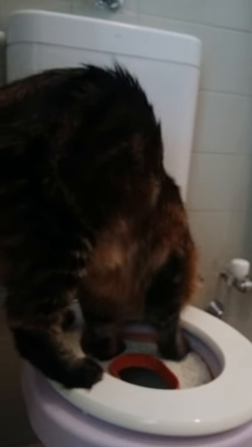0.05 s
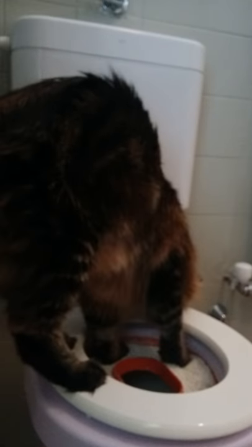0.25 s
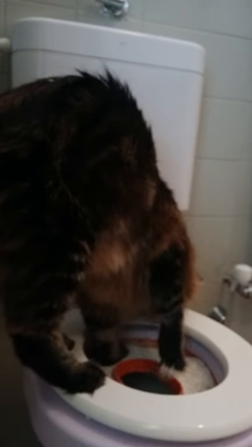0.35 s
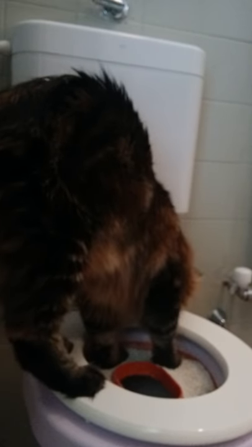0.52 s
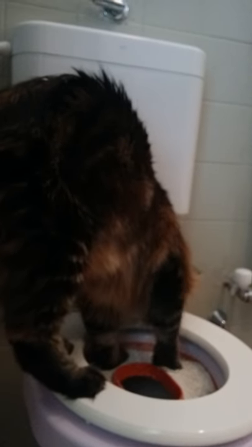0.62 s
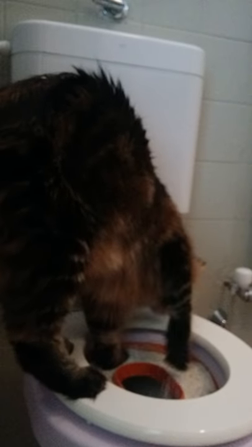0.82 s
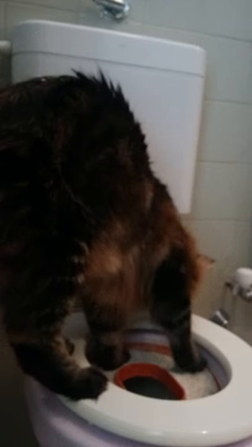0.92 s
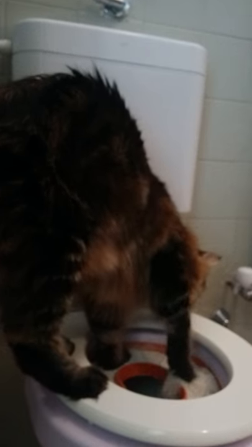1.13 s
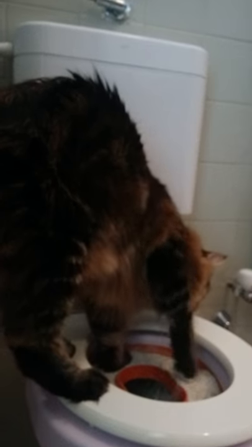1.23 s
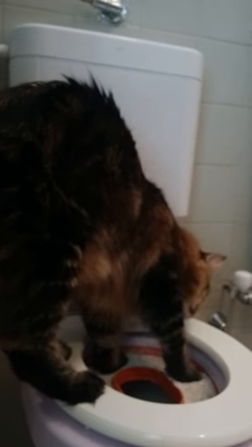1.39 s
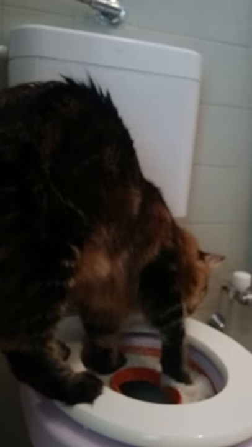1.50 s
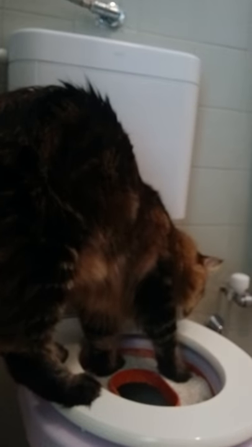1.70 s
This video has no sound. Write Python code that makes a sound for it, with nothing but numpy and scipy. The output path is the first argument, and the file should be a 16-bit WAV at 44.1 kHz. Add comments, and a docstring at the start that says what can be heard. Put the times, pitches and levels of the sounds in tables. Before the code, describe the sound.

A cat digs in grainy litter in a plastic tray. A few grains stir, then at about 0.2 seconds the tray snaps loudly, ringing briefly in a small tiled bathroom, and grains scatter. Three softer scraping strokes follow at about 0.7, 1.1 and 1.5 seconds, with thin claw scratches, skittering grains and soft low bumps from the tray. The gaps between strokes are nearly silent.

```python
"""A cat digs in grainy litter in a plastic training tray set in a toilet, in a small tiled bathroom.
First a few grains stir. At about 0.2 s a claw catches the tray, which snaps back and rings.
From about 0.6 s the paw lands and drags through the litter three times: claws scratch,
loose grains skitter over the plastic, and the tray booms softly under the cat's weight.
In the gaps, and as the last stroke dies away, a phone's noise suppressor turns the sound down."""
import sys
import numpy as np
from scipy import signal
from scipy.fft import rfft, irfft
from scipy.io import wavfile
from scipy.ndimage import uniform_filter1d

SR = 44100
rng = np.random.default_rng(int(sys.argv[2]) if len(sys.argv) > 2 else 0)


def log_audio(samples):
    """Write samples as a 16-bit WAV file to the path given in sys.argv[1]."""
    # one column per channel
    frames = np.atleast_2d(samples).T
    # limit to full scale, then quantise
    limited = np.clip(frames, -1, 1)
    pcm = np.round(limited * 32767).astype(np.int16)
    wavfile.write(sys.argv[1], SR, pcm)


N = 77175

# Each level_db is relative to the other rows of its table.
# Tone colours, or how strong each sound is from low to high: pitch_hz, level_db
ROOM_NOISE_TONE = [(25, -11.5), (45, -10), (65, -0.5), (95, -3), (200, -14.5), (400, -15.5), (700, -9.5),
                   (1400, -11.5), (3000, -18.5), (6000, -14.5), (16000, -18.5)]
CREAK_TONE = [(30, -14.5), (100, -11), (160, -1), (240, -9.5), (320, -8), (410, -16.5), (540, -8),
              (800, -6.5), (1400, -17.5), (4000, -44)]
SKITTER_TONE = [(200, -29), (900, -24.5), (2700, -32.5), (3700, -13.5), (4700, -7), (5400, -1.5), (6200, 2),
                (7300, -4), (10000, -6.5), (13500, -11.5), (16000, -23)]
SCRATCH_TONE = [(200, -36), (1200, -19), (2500, -24.5), (3500, -14), (4500, -11.5), (5100, 1.5), (6100, -1),
                (7200, -8.5), (8500, -18), (16000, -33)]
PAW_TONE = [(30, -36.5), (150, -30.5), (450, -35), (750, -10), (1000, -5.5), (1200, 2.5), (1450, 2),
            (1750, -2), (2150, 0), (2800, -10), (3400, -28.5), (6000, -38), (16000, -54.5)]
DRAG_TONE = [(30, -29.5), (100, -20), (200, -10.5), (380, -16.5), (580, -5.5), (950, -1), (1200, 1),
             (1650, -2), (2100, 4.5), (2800, -3.5), (3700, -1.5), (5200, -7), (6100, -5.5), (8000, -13.5),
             (11000, -22.5), (16000, -33.5)]
SNAP_TONE = [(30, -34), (100, -29), (320, -22), (450, -32), (700, -27), (930, -12.5), (1090, -10.5),
             (1190, 2), (1450, -1), (1750, -3.5), (2200, -6), (2600, -2.5), (3000, -11.5), (3450, -6.5),
             (3900, -12), (4900, -2), (5400, -7), (6000, -0.5), (7000, -8.5), (8300, -1.5), (9700, -6.5),
             (11300, -7.5), (12600, -17), (16000, -21.5)]
# The tray's low booming notes and high ringing notes: pitch_hz, level_db, ring_s (time to fade 60 dB)
TRAY_LOW_NOTES = [(141.7, -5, 0.11), (167.7, -1, 0.18), (314.6, -17, 0.21), (524, -22.5, .3)]
TRAY_HIGH_NOTES = [(1151.8, 2, 0.52), (1271, 1, .4), (1432, -6, 0.45), (1533, -2, .32), (1720, -2.5, .34),
                   (2703, -7.5, 0.15), (4450, -7, .2), (5880, -4, 0.19), (5900, -4, 0.22), (7643, -7, .2),
                   (8334, -7.5, 0.12)]
# The cat's weight pushing on the tray: start_s, level_db, push_s
TRAY_PUSHES = [(.218, -43, 0.039), (.262, -55, 0.02), (0.353, -47, 0.031), (.69, -63, 0.027),
               (0.746, -45.5, 0.037), (.81, -66, .022), (1.059, -50.5, 0.061), (1.195, -61, 0.085),
               (1.455, -60, .035), (1.497, -54, 0.019), (1.546, -52, 0.021)]
# Showers of loose grains: start_s, level_db, rise_s, fade_s, treble_boost_db
GRAIN_SHOWERS = [(0.015, -58, 0.0055, 0.0085, 9.5), (0.03, -52, .008, 0.055, 4.5),
                 (.136, -51, 0.0007, 0.0092, 3.5), (0.3116, -29.5, 0.0034, 0.016, 2.5),
                 (0.67, -51.5, 0.0065, 0.05, 5), (.951, -52.5, 0.0029, .012, 7),
                 (.963, -39, 0.0038, 0.02, -1), (1.071, -39, 0.011, 0.011, 5.5),
                 (1.195, -65.5, .01, 0.062, 7.5), (1.44, -48.5, 0.0072, .012, 3.5),
                 (1.61, -56.5, 0.018, 0.044, -3)]
# Claws scratching along the plastic: start_s, level_db, hold_s
CLAW_SCRATCHES = [(0.16, -50, 0.011), (.448, -49, 0.024), (0.618, -60.5, 0.018), (0.699, -45, 0.087),
                  (0.808, -43, 0.028), (0.847, -47, .015), (0.962, -50.5, .016), (1.036, -49.5, 0.019),
                  (1.448, -51, 0.011)]
# The paw pressing into the litter: start_s, level_db, hold_s, fade_db (lost during the hold)
PAW_PRESSES = [(0, -62, .07, 4), (.166, -45, .045, 6), (.5945, -41, .055, 4), (1.0415, -37, .006, 2),
               (1.4345, -34, .018, 5)]
# The paw dragging through the litter: start_s, peak_s, end_s, level_db, swell_db, fade_db
PAW_DRAGS = [(0.144, 0.169, 0.23, -47.5, 7.5, 5.5), (0.454, .458, 0.466, -52, 2, 3),
             (0.682, 0.749, 0.82, -35.5, 12.5, 13), (1.033, 1.084, 1.194, -40.5, 7.5, 9),
             (1.429, 1.521, 1.59, -43.5, 1.5, 7.5)]
# The claw snapping off the tray, then the tray's rebounds: start_s, level_db
TRAY_SNAPS = [(0.2193, -15.5), (0.2215, -17.5), (.2223, -16.5), (0.2279, -26)]

FADE_60_DB = np.log(1000)  # exp(-FADE_60_DB) is a drop of 60 dB


def gain(db):
    """Turn decibels into a number to multiply by."""
    return 10 ** (np.asarray(db) / 20)


def clock():
    """The time of every sample, in seconds."""
    return np.arange(N) / SR


def through(sound, response):
    """Play a sound through something, given how that thing answers one click."""
    return signal.fftconvolve(sound, response)[:N]


def colour(sound, tone):
    """Filter a sound so that it takes on a tone colour."""
    size = 2048
    hz, db = np.array(tone).T
    bin_hz = np.maximum(np.arange(size // 2 + 1) * SR / size, 1)
    curve = gain(np.interp(np.log(bin_hz), np.log(hz), db))
    # Fold the second half onto the first, so the filter never answers before the sound arrives.
    cepstrum = irfft(np.log(curve))
    cepstrum[1:size // 2] *= 2
    cepstrum[size // 2 + 1:] = 0
    response = irfft(np.exp(rfft(cepstrum)))
    return through(sound, response / np.linalg.norm(response))


def lows(sound, below_hz):
    """Keep the part of a sound below a pitch."""
    return signal.sosfiltfilt(signal.butter(2, below_hz, fs=SR, output="sos"), sound)


def wobble(below_hz):
    """A slow random wiggle with a typical size of 1."""
    wiggle = lows(rng.standard_normal(N), below_hz)
    return wiggle / np.std(wiggle)


def clicks(per_s, scatter_db):
    """Tiny clicks at random times, many small and a few large."""
    hits = (rng.random(N) < per_s / SR) * rng.choice([-1, 1], N)
    hits = hits * gain(scatter_db * np.minimum(rng.exponential(size=N), 4))
    return hits / np.std(hits)


def burst(start_s, rise_s, hold_s, fade_s):
    """A loudness shape that rises, holds, then dies away."""
    age = clock() - start_s
    return np.clip(age / rise_s, 0, 1) * np.exp(-np.maximum(age - rise_s - hold_s, 0) / fade_s)


def room_noise(noise_db=-66, hum_db=-80, hum_hz=99):
    """Faint room noise with an electrical hum."""
    noise = colour(rng.standard_normal(N), ROOM_NOISE_TONE)
    return gain(noise_db) * noise + gain(hum_db) * np.sin(2 * np.pi * hum_hz * clock())


def bathroom_echo(sound, ring_s=.4, treble_ring_s=.24, delay_s=.0018):
    """Sound bounces between close tiles; the treble dies a little sooner."""
    t = clock()
    noise = rng.standard_normal(N)
    low = lows(noise, below_hz=4700)
    low_tail = low * np.exp(-FADE_60_DB * t / ring_s)
    high_tail = (noise - low) * np.exp(-FADE_60_DB * t / treble_ring_s)
    tail = (low_tail + high_tail) * (t > delay_s)
    return through(sound, tail / np.linalg.norm(tail))


def tray_ringing():
    """The tray's answer to one tap: several high notes fading together."""
    t = clock()
    ring = sum(gain(db) * np.sin(2 * np.pi * (hz * t + rng.random())) * np.exp(-FADE_60_DB * t / ring_s)
               for hz, db, ring_s in TRAY_HIGH_NOTES)
    return ring / np.linalg.norm(ring)


def tray_bending(creak_db=-10.5):
    """Each push swells the tray's low notes and rubs it dully on its seat."""
    def weight(fade_s):
        return sum(gain(db) * burst(start, push / 2, push / 4, fade_s) for start, db, push in TRAY_PUSHES)

    sound = gain(creak_db) * weight(fade_s=.013) * colour(rng.standard_normal(N), CREAK_TONE)
    for hz, db, ring_s in TRAY_LOW_NOTES:
        wavering_note = np.sin(2 * np.pi * hz * clock() + .56 * wobble(below_hz=12))
        sound += gain(db) * weight(ring_s / FADE_60_DB) * wavering_note
    return sound


def skittering_grains():
    """Loose grains hit bare plastic in short, bright showers."""
    ticks = colour(clicks(per_s=4200, scatter_db=2), SKITTER_TONE)
    body = lows(ticks, below_hz=7800)
    treble = ticks - body
    return sum(gain(db) * burst(start, rise, 0, fade) * (body + gain(boost_db) * treble)
               for start, db, rise, fade, boost_db in GRAIN_SHOWERS)


def claw_scratches():
    """Claws stick and slip on the plastic, making a thin rasp."""
    pressure = sum(gain(db) * burst(start, rise_s=.0087, hold_s=hold, fade_s=.005)
                   for start, db, hold in CLAW_SCRATCHES)
    return colour(pressure * clicks(per_s=2900, scatter_db=1.5), SCRATCH_TONE)


def paw_presses(tray_ring, ring_db=-20):
    """The paw crushes litter against the tray: a dull crunch and a faint ring."""
    force = np.zeros(N)
    for start, db, hold, fade_db in PAW_PRESSES:
        progress = np.clip((clock() - start) / hold, 0, 1)
        force += gain(db - fade_db * progress) * burst(start, rise_s=.001, hold_s=hold, fade_s=.005)
    crunch = colour(force * clicks(per_s=3000, scatter_db=2.5), PAW_TONE)
    return crunch + gain(ring_db) * through(crunch, tray_ring)


def paw_drags(edge_s=.004, spurt_db=1.74):
    """Grains rub and tumble in small spurts as each stroke swells, eases and lifts off."""
    effort = np.zeros(N)
    for start, peak, end, db, swell_db, fade_db in PAW_DRAGS:
        shape_db = np.interp(clock(), [start, peak, end], [-swell_db, 0, -fade_db])
        effort += gain(db + shape_db) * burst(start, edge_s, end - start, edge_s)
    spurts = gain(spurt_db * wobble(below_hz=69))
    return colour(effort * spurts * clicks(per_s=3500, scatter_db=1.5), DRAG_TONE)


def tray_snap(tray_ring, fade_s=.0012, echo_db=1.5, ring_db=-14):
    """The plastic springs back with sharp cracks; the tray and room answer them as one click."""
    t = clock()
    force = sum(gain(db) * (t >= start) * np.exp(-np.maximum(t - start, 0) / fade_s)
                for start, db in TRAY_SNAPS)
    click = np.zeros(N)
    click[int(TRAY_SNAPS[0][0] * SR)] = np.linalg.norm(force)  # as much energy as all the cracks
    cracks = force * rng.choice([-1, 1], N)
    echo = gain(echo_db) * bathroom_echo(click)
    return colour(cracks + echo, SNAP_TONE) + gain(ring_db) * through(click, tray_ring)


def scene(snap_db=9, digging_db=-1, digging_echo_db=-9):
    """The snap fills the room; the digging, down in the tray, echoes less."""
    tray_ring = tray_ringing()
    digging = paw_presses(tray_ring) + paw_drags() + claw_scratches() + skittering_grains()
    snap = gain(snap_db) * tray_snap(tray_ring)
    echo = gain(digging_echo_db) * bathroom_echo(digging)
    return (snap + gain(digging_db) * digging + echo + tray_bending() + room_noise())[None]


def record(dry, ceiling=.8, quiet_db=-51.5, cut_db=10, softness_db=6, average_s=.019):
    """The microphone rounds off peaks; a noise suppressor lowers quiet moments above the bass."""
    sound = ceiling * np.tanh(dry[0] / ceiling)
    bass = lows(sound, below_hz=550)
    upper = sound - bass
    power = uniform_filter1d(upper ** 2, int(average_s * SR))
    level_db = 10 * np.log10(np.maximum(power, 1e-14))
    quietness = (1 - np.tanh((level_db - quiet_db) / softness_db)) / 2  # 0 when loud, 1 when quiet
    suppressed = bass + gain(-cut_db * quietness) * upper
    top_cut = signal.ellip(10, .2, 80, 15900, fs=SR, output="sos")  # removes treble above 15900 Hz
    return signal.sosfilt(top_cut, suppressed)[None]


dry = scene()
out = record(dry)
log_audio(out)
```